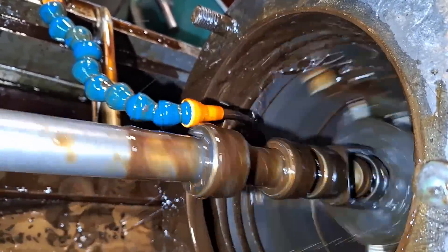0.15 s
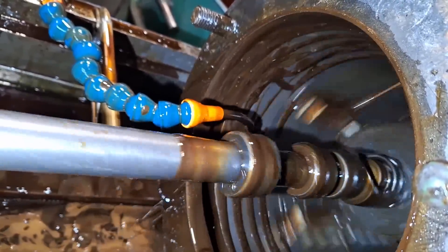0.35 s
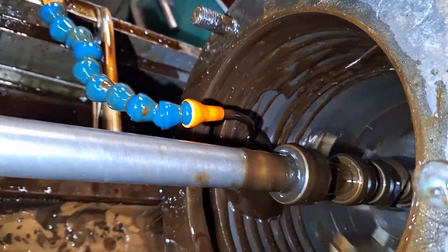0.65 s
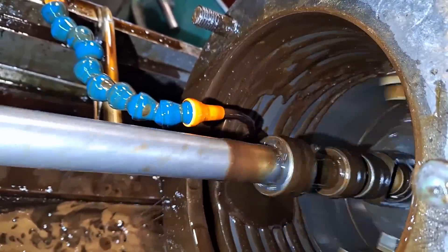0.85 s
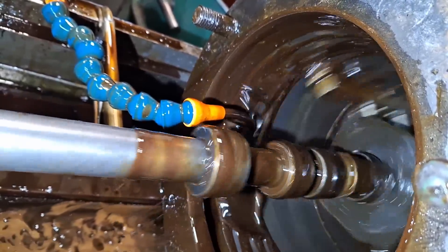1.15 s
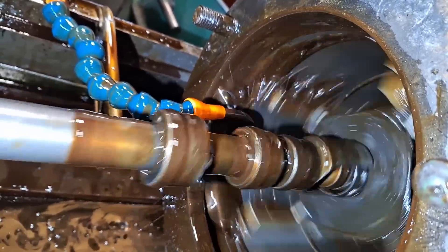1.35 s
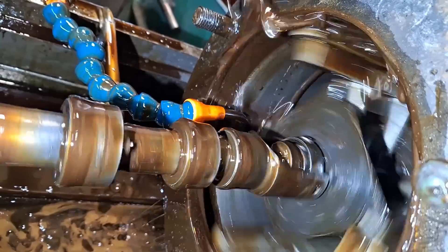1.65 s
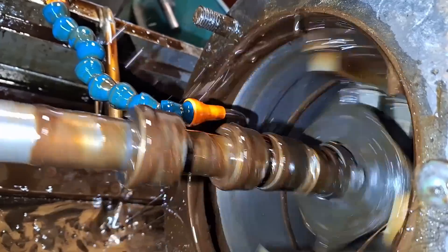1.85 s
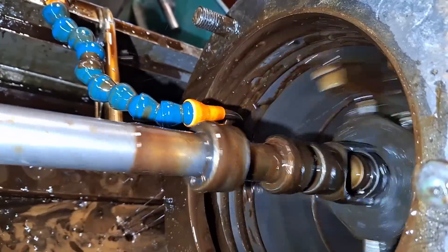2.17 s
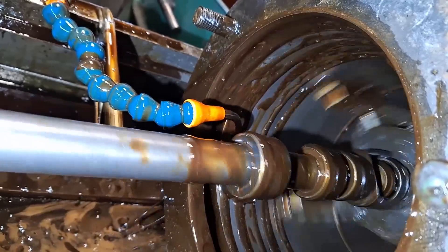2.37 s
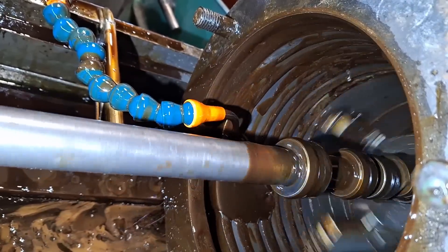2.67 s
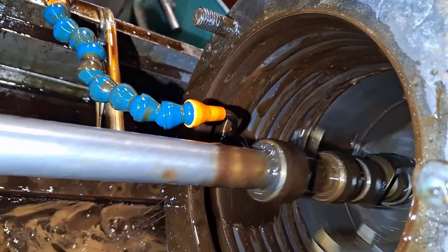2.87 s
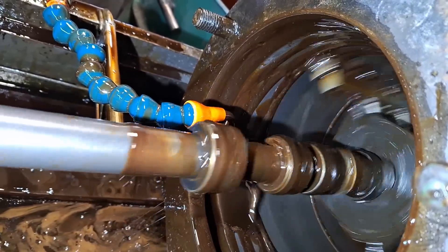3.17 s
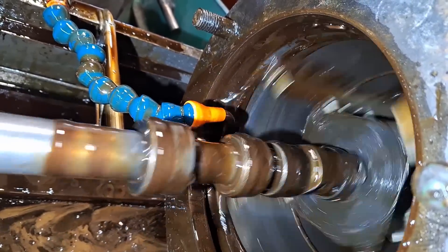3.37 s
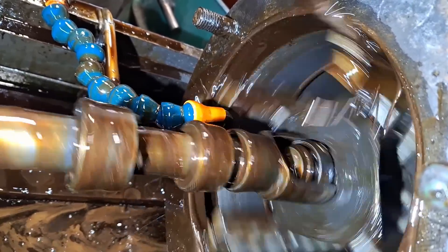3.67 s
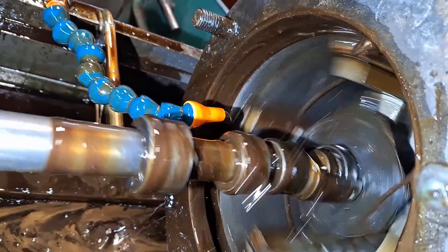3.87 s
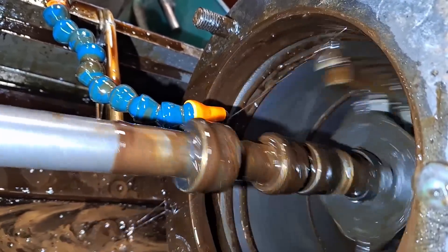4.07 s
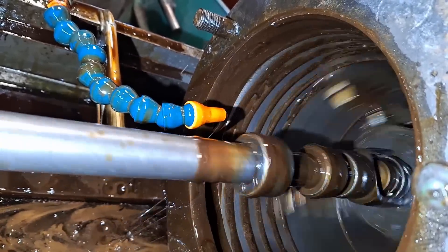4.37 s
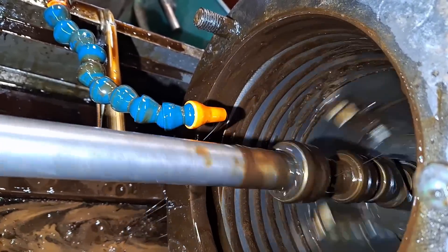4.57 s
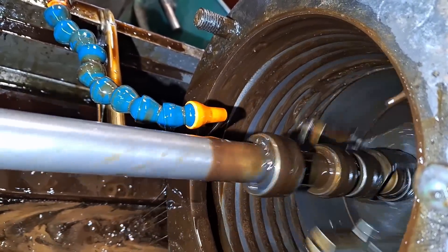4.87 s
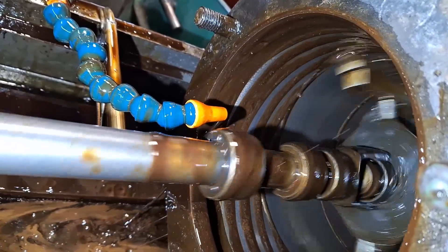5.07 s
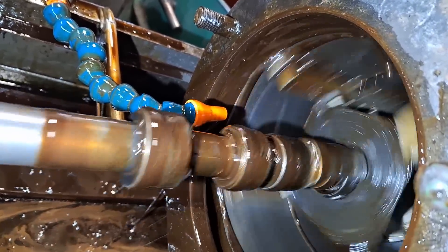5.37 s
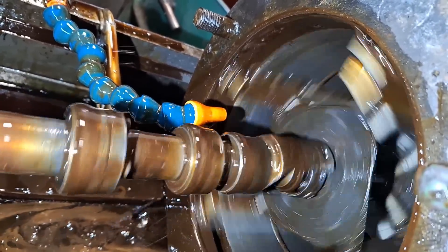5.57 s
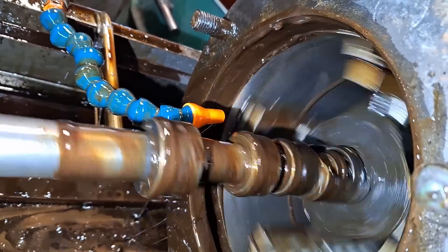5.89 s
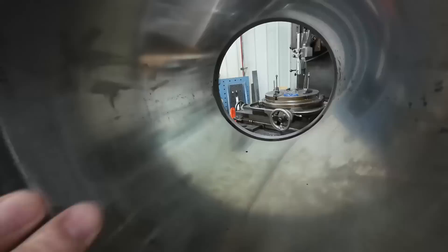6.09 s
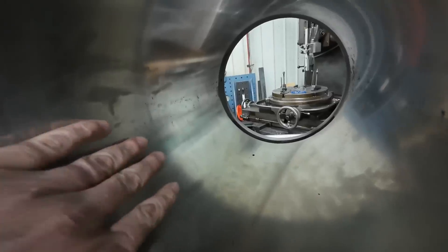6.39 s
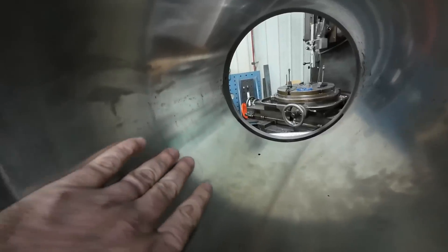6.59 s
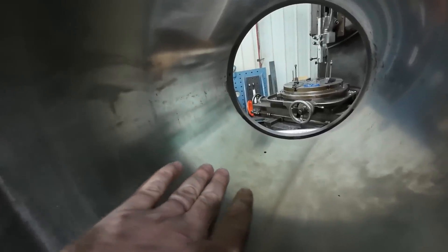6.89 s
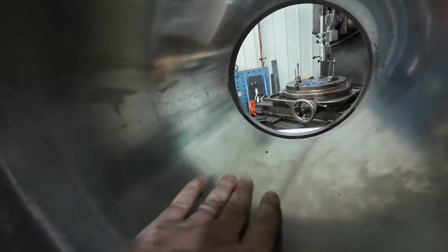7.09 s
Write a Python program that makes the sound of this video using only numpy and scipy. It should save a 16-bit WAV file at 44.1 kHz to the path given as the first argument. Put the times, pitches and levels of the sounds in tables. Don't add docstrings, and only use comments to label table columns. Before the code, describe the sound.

Close in a machine shop, a hone strokes through an oil-flooded iron cylinder: swelling mains hum, gritty scraping, ringing wall and bright oil hiss. A valve clanks with a small bounce at each reversal, about once a second, amid ticks and dull knocks. A distant compressor runs down early. Near the end it cuts to a far quieter hollow bore, with a faint finger brush and distant machines.

```python
import sys
import numpy as np
from scipy import signal
from scipy.fft import rfft, irfft, next_fast_len
from scipy.io import wavfile
from scipy.ndimage import uniform_filter1d

SR = 44100
rng = np.random.default_rng(int(sys.argv[2]) if len(sys.argv) > 2 else 0)


def volts_from_db(level):
    exponent = np.asarray(level, float) / 20
    return 10 ** exponent


def to_wav(sig):
    pcm = np.clip(np.atleast_2d(sig), -1, 1) * 32767
    pcm = np.round(pcm).astype(np.int16)
    wavfile.write(sys.argv[1], SR, pcm.T)


N = 319264
TIME = np.arange(N) / SR

# start in seconds, peak in dB, housing in dB re peak.
CLANKS = [
    (0.6728, -13, -6.5),
    (1.649, -13, -6.5),
    (2.657, -14, -5),
    (3.622, -13.5, -7.5),
    (4.6306, -13.5, -7),
    (5.597, -15, -4),
]


def curves(table):
    s, *columns = np.transpose(table)
    return [np.interp(TIME, s, c) for c in columns]


def along(table, hz):
    f, v = np.transpose(table)
    return np.interp(np.log(hz + 1), np.log(f), v)


def unit(x):
    return x / np.sqrt(np.mean(x ** 2))


def walk(rate_hz):
    k = int(SR / rate_hz)
    held = np.repeat(rng.standard_normal(N // k + 1), k)
    return 1.07 * uniform_filter1d(uniform_filter1d(held, k), k)[:N]


def bump(age_s, length_s):
    return np.exp(-(age_s / length_s) ** 2)


def ports(common, apart, hz):
    # frequency in Hz, likeness (clipped to 0-1).
    likeness = [(60, 2), (130, 0), (290, 2), (640, 0.24), (1410, 0.22), (3100, 0.22), (6820, 0.08),
                (15000, -0.2)]
    # frequency in Hz, left minus right in dB.
    balance = [(60, 2), (110, 2.5), (200, 1), (380, -1), (700, -2), (1290, -1.5), (2380, -7.5),
               (4400, -3.5), (8120, -2.0), (15000, -6.5)]
    lag_s = 24 / SR
    like = np.clip(along(likeness, hz), 0, 1)
    turns = hz * lag_s * np.clip(hz / 1500, 0, 1) * (hz < 4600)
    late = np.exp(-2j * np.pi * turns)
    tilt = volts_from_db(along(balance, hz) / 2)
    shared = np.sqrt(like) * common
    own = np.sqrt(1 - like)
    left = tilt * (shared * late + own * apart[0])
    right = (shared + own * apart[1]) / tilt
    return np.array([left, right])


def wash(colour, flicker_db, rate_hz, grit_db=0., wide=True):
    size = next_fast_len(N)
    hz = np.arange(size // 2 + 1) * SR / size
    low_hz, high_hz = colour[0][0], colour[-1][0]
    grains = rng.standard_normal((3, N)) * volts_from_db(grit_db * rng.exponential(size=(3, N)))
    common, *apart = rfft(grains, size)
    spectra = ports(common, apart, hz) if wide else np.array([common, common])
    spectra = spectra * volts_from_db(along(colour, hz)) * (hz > low_hz) * (hz < high_hz)
    out = 0
    for octave in np.arange(np.log2(low_hz), np.log2(high_hz) + .5, .5):
        share = np.clip(1 - 2 * abs(np.log2(hz + 1) - octave), 0, 1)
        out = out + volts_from_db(flicker_db * walk(rate_hz)) * irfft(spectra * share, size)[:, :N]
    return unit(out)


def ring(x, hz, width_hz):
    return signal.lfilter(*signal.iirpeak(hz, hz / width_hz, SR), x)


def place(x, pan_db, size=0):
    return np.array([np.roll(x, size) * volts_from_db(pan_db / 2), x * volts_from_db(-pan_db / 2)])


def tone(hz, wobble_rad):
    return np.sqrt(2) * np.sin(2 * np.pi * hz * TIME + wobble_rad * walk(7))


def burst(s, length_s, firm=0.):
    age_s = np.maximum(TIME - s, 0)
    contacts = rng.standard_normal(N)
    solid = firm * np.sqrt(length_s * SR) * (np.arange(N) == int(s * SR))
    fade = np.exp(-age_s / length_s) * (1 + 0.86 * np.exp(-age_s / 0.0015))
    return (TIME >= s) * fade * contacts + solid


def struck(drive, modes):
    y = 0
    for hz, db, t60_s in modes:
        y = y + volts_from_db(db) * np.sqrt(t60_s) * ring(ring(drive, hz, 2.0 / t60_s), hz, hz / 3)
    return y / abs(y).max()


def catches(events, sharpness, pan_db, size):
    rings = [volts_from_db(db) * struck(burst(s, length_s), [(hz, 0, sharpness / hz)]) for s, db, hz, length_s in events]
    return place(sum(rings), pan_db, size=size)


def stroke():
    # seconds from closing, hum in dB, second harmonic in dB,
    # extra stone pressure in dB.
    cycle = [(0, -28, -53, 1.5), (.15, -27, -45, 1), (.33, -24, -43.5, 1.5), (.43, -20.5, -47, 2.1),
             (.68, -20.5, -40.5, 4), (.86, -21, -42, 1.5), (.98, -23.5, -43, 0.6), (1.22, -23, -41.5, 0.7),
             (1.33, -27.5, -50.5, .5), (1.65, -25, -43.5, 2.6), (1.78, -27, -54, 2.1)]
    cycle_s, closes_s = 1.993, 1.036
    s, *columns = np.transpose(cycle)
    age_s = (TIME - closes_s + cycle_s / 2) % cycle_s - cycle_s / 2
    return age_s, *[np.interp(age_s, s, c, period=cycle_s) for c in columns]


def motors():
    # time in seconds, drone in dB, whine in dB.
    rundown = [
        (0, -36, -50),
        (.4, -32, -48),
        (.85, -33.5, -48),
        (.97, -36, -39),
        (1.2, -37, -37),
        (1.42, -41, -35),
        (1.52, -48, -54),
        (1.7, -54, -57),
    ]
    # frequency in Hz, level in dB re drone.
    casing = [(145, -12.5), (281, -12.5), (368, -16.5), (432, -17), (510, -13.5)]
    # frequency in Hz, level in dB per Hz.
    rumble = [(45, -18), (65, -4.5), (95, 2.5), (145, 7), (185, -3.5), (260, -3), (330, -9.5), (420, -34)]
    # frequency in Hz, level in dB per Hz.
    thud = [(18, -40), (30, -17), (40, -5), (50, 0), (60, -4), (70, -20)]
    hum_hz, drone_hz, whine_hz, pump_hz = 120.03, 73.2, 213, 1515
    age_s, hum_db, second_db, _ = stroke()
    drone_db, whine_db = curves(rundown) - 40 * np.clip(TIME - 1.7, 0, 2)

    running = np.clip((drone_db + 50) / 12, 0, 1)
    null_db = -11 * bump(age_s, .026)
    jolt_db = -3.5 * sum(bump(TIME - row[0], .03) for row in CLANKS[::2])
    sag_db = -2 * running
    hum_db = hum_db + null_db + jolt_db + sag_db + .6 * walk(12)
    hum = volts_from_db(hum_db) * tone(hum_hz, wobble_rad=0.27)
    hum = hum + volts_from_db(second_db) * tone(2 * hum_hz, wobble_rad=0.45)

    drone = volts_from_db(drone_db - 0.7) * tone(drone_hz, wobble_rad=0.26)
    for hz, db in casing:
        drone = drone + volts_from_db(0.58 * drone_db - 15 + db) * tone(hz, wobble_rad=1.0)
    whine = volts_from_db(whine_db) * tone(whine_hz, wobble_rad=.3)

    pump_db = -52.5 + 7 * bump(age_s, 0.53) + 1.4 * walk(2.8)
    pump = volts_from_db(pump_db) * unit(ring(rng.standard_normal(N), pump_hz, 22))

    shake_db = -48 + 4.5 - 1.34 * TIME
    frame = volts_from_db(-35) * wash(rumble, 1.15, 5.5) + volts_from_db(shake_db) * wash(thud, 3.1, 2.8)
    return place(hum + drone, 4.5) + place(whine, 2.5) + place(pump, -1.5) + frame


def hone():
    # frequency in Hz, width in Hz, level in dB.
    wall_modes = [(283.5, 49, -50.5), (355.7, 15, -50.5), (446, 19, -54.5), (505.5, 4.8, -57.5),
                  (566, 16, -57), (843, 45, -45.5), (1193, 30, -50.5), (1752, 44, -47.5), (1960, 120, -48),
                  (3050, 34, -47.5), (3244, 210, -47), (3470, 17, -43), (3623, 53, -52.5), (5540, 250, -53)]
    # frequency in Hz, level in dB per Hz.
    ring_colour = [(160, -16), (280, -6.5), (308, -1.5), (467, -1), (632, -3.5), (851, -8), (935, -8),
                   (1160, -4.5), (1260, -15), (1400, -8.5), (1820, -41), (3080, -120)]
    # frequency in Hz, level in dB per Hz.
    scrape_colour = [(760, -45.5), (1300, -7.5), (1530, 0), (1640, -4), (1760, -1), (2450, -3.5), (3030, 0),
                     (3260, -3), (3550, 0.5), (4520, -6.5), (4800, -9.5), (6240, -14), (10600, -120)]
    # frequency in Hz, level in dB per Hz.
    hiss_colour = [(2590, -33), (4400, -2), (4700, -5.5), (5130, 1), (5730, 1.5), (6300, -0.5), (7430, -1),
                   (10400, -8.5), (11800, -8.5), (15300, -41), (22000, -120)]
    # frequency in Hz, level in dB per Hz.
    spray_colour = [(10500, -18), (11500, -3.5), (12500, -1), (13200, 0.5), (14200, -0.5), (15000, 1.5),
                    (15700, 0.5), (16000, -6)]
    # frequency in Hz, level in dB per Hz.
    throttle_colour = [(11300, -22), (11900, 0), (12700, 1), (13300, 3), (13900, -20)]
    # time in seconds, gain in dB, length in seconds.
    spurts = [
        (1.73, 0.5, 0.018),
        (1.857, 1, 0.012),
        (2.818, 0.5, 0.018),
        (3.683, -0.5, 0.015),
        (3.835, 2.5, 0.016),
        (4.925, 1.5, 0.012),
        (5.424, 1, .02),
        (5.807, 3.5, 0.02),
    ]
    press_db = stroke()[-1]
    swing_db = press_db - np.mean(press_db)

    wall = 0
    for hz, width_hz, db in wall_modes:
        grit = rng.standard_normal((2, N)) + 400 / hz * rng.standard_normal(N)
        wall = wall + volts_from_db(db + 3.4 * walk(8.1)) * unit(ring(grit, hz, width_hz))
    wall = volts_from_db(swing_db) * wall
    ring_db = -36.5 - 0.63 * TIME + .7 * swing_db
    bore = volts_from_db(ring_db) * wash(ring_colour, 2.0, 11, grit_db=2.5)

    scrape = volts_from_db(-33.5 + press_db + 2.4) * wash(scrape_colour, 1.4, 22, grit_db=1.5)
    hiss = volts_from_db(-32 + 0.41 * press_db + 1.46) * wash(hiss_colour, 0.6, 18, grit_db=2.35)
    spray = volts_from_db(-38.5 + 0.55 * press_db + 4.5) * wash(spray_colour, .8, 20, grit_db=2.2)
    spurt_db = sum(db * bump(TIME - s, length_s) for s, db, length_s in spurts)
    reversals = np.searchsorted(np.array(CLANKS)[:, 0], TIME)
    inward = uniform_filter1d(1. - reversals % 2, size=1500)
    throttle = volts_from_db(-38) * inward * wash(throttle_colour, .8, 16)

    sway = place(np.ones(N), -0.11 * swing_db)
    slosh = volts_from_db(.85 * walk(24))
    return slosh * sway * (scrape + volts_from_db(spurt_db) * (hiss + spray) + throttle) + bore + wall


def stones():
    # start in seconds, peak in dB, ring in Hz, length in seconds.
    ticks = [(1.782, -15, 3000, .007), (1.79, -15, 3620, .011), (1.825, -32, 5600, .006),
             (3.56, -21, 5270, .004), (3.565, -8.5, 3360, 0.0053), (1.27, -21, 3460, 0.0055),
             (5.782, -18.5, 3450, 0.028), (5.797, -21, 4050, .01), (3.69, -28, 3200, .004),
             (4.69, -31, 3400, .006), (4.812, -22.5, 3480, 0.01), (5.338, -20, 3770, 0.0044),
             (5.657, -25, 3050, .004)]
    # start in seconds, peak in dB, ring in Hz.
    further = [(0.3551, -17, 3060), (0.7711, -23, 3690), (1.6626, -22, 3540), (2.141, -26, 3460),
               (2.7422, -23, 2910), (3.7693, -23, 3430), (4.0594, -27, 3420), (4.1094, -23, 2990),
               (4.2278, -26, 2980), (4.3715, -20, 3450), (5.1213, -25, 3400), (5.5692, -22, 3510),
               (5.7009, -23, 2930), (5.7877, -20, 3470)]
    light = [(s, db - 2, hz, .006) for s, db, hz in further]
    return catches(list(ticks) + light, 18, -4.5, size=24)


def shaft_joint():
    # start in seconds, peak in dB, ring in Hz, length in seconds.
    knocks = [
        (.79, -22, 800, 0.0087),
        (1.848, -20.5, 300, 0.0037),
        (4.91, -25, 350, 0.006),
        (5.44, -22, 600, .006),
        (5.655, -19, 800, 0.0046),
        (.575, -24, 900, 0.0041),
        (2.58, -26, 800, 0.0043),
        (3.84, -30, 500, .006),
    ]
    return catches(knocks, 1.9, .3, size=4)


def valve():
    # frequency in Hz, level in dB, t60 in seconds.
    spool_modes = [
        [(1684, 3, 0.034), (1797, 0, 0.069), (1977, -1, 0.062), (2290, -10, 0.051), (1448, -6, .06)],
        [(1555, -0.5, 0.044), (1785, 0.5, 0.049), (2133, -6, 0.04), (1953, -6.5, .06), (2264, -6.5, 0.076)],
    ]
    # frequency in Hz, level in dB, t60 in seconds.
    housing_modes = [
        [(563, -0.5, 0.12), (900, -4, 0.077), (1115, -9.5, 0.085), (246, -4, 0.048)],
        [(628, -4.5, 0.13), (936, -4, 0.054), (1194, -5, 0.082), (560, -9.5, 0.12)],
    ]
    # delay in seconds, level in dB.
    bounces = [
        (0, 0),
        (.018, -7.5),
        (.042, -12),
        (.062, -17),
    ]
    # frequency in Hz, level in dB, t60 in
    # seconds.
    tail_modes = [(700, -20, .004), (1050, -22, 0.0033), (1800, -21, .002)]
    rattle_s, housing_late_s, tail_late_s = 0.0041, 0.001975, 0.0068
    firm = volts_from_db(7.5)
    out = 0
    for k, (s, db, housing_db) in enumerate(CLANKS):
        blows, late = 0, 0
        for delay_s, fall_db in bounces:
            blows = blows + volts_from_db(fall_db) * burst(s + delay_s, rattle_s, firm)
            late = late + volts_from_db(0.45 * fall_db) * burst(s + delay_s + housing_late_s, 1.2 * rattle_s, firm)
        spool = place(struck(blows, spool_modes[k % 2]), -5.5, size=24)
        housing = place(struck(late, housing_modes[k % 2]), -.3, size=10)
        tail = np.array([struck(burst(s + tail_late_s, .04), tail_modes) for _ in range(2)])
        out = out + volts_from_db(db) * (spool + volts_from_db(housing_db) * housing) + volts_from_db(db - 9.5) * tail
    return out


def quiet_shop():
    # frequency in Hz, level in dB per Hz.
    shop_colour = [(30, -44), (60, -19), (85, -20), (125, -25), (160, -14), (205, -21), (250, -9),
                   (340, -13), (440, -10), (630, -15.5), (1150, -17.5), (2600, -25.5), (4000, -36),
                   (8000, -43.5), (16000, -55)]
    # frequency in Hz, level in dB per Hz.
    brush_colour = [(2500, -20), (4000, 0), (5500, -1), (7000, -6), (8300, -1), (10000, -9), (13000, -11),
                    (16000, -18)]
    # frequency in Hz, level in dB per Hz.
    air_colour = [(4000, -11), (6000, -5), (10000, -6), (12500, -1), (13900, 2), (15000, -5), (16000, -9)]
    # time in seconds, brush in dB, squeak in Hz, squeak in dB.
    fingers_path = [
        (6.11, -57, 14400, -74),
        (6.14, -56, 14000, -69),
        (6.19, -57, 13400, -69),
        (6.22, -59, 12800, -71),
        (6.24, -62, 11800, -84),
        (6.27, -65, 10500, -76),
        (6.31, -76, 9800, -95),
        (6.38, -92, 9500, -110),
    ]
    # time in seconds, level in dB.
    leak_path = [
        (6.3, -92),
        (6.41, -88),
        (6.46, -72),
        (6.6, -73),
        (6.9, -73),
        (7.12, -74),
        (7.24, -79),
    ]
    brush_db, squeak_hz, squeak_db = curves(fingers_path)
    pitch_hz = squeak_hz * (1 + .006 * walk(400))
    squeak = volts_from_db(squeak_db + 3.5 * walk(90)) * np.sin(2 * np.pi * np.cumsum(pitch_hz) / SR)
    fingers = volts_from_db(brush_db) * wash(brush_colour, 2.2, 10, wide=False) + squeak
    leak = volts_from_db(curves(leak_path)[0]) * wash(air_colour, .8, 12, wide=False)
    boom = volts_from_db(-62.5 + 1.4 * walk(11)) * tone(172, wobble_rad=.7)
    return volts_from_db(-52) * wash(shop_colour, 1.8, 5.5, wide=False) + fingers + leak + boom


def scene():
    change_s = 6.1095
    before = np.clip((change_s - TIME) * SR / 20, 0, 1)
    honing = motors() + hone() + stones() + shaft_joint() + valve()
    return before * honing + (1 - before) * quiet_shop()


def roll_off(x):
    return signal.sosfilt(signal.butter(12, 17080, fs=SR, output="sos"), x)


def record(dry):
    peak_limit, top_hz = .75, 15800
    rounded = peak_limit * np.tanh(dry / peak_limit)
    low_pass = signal.ellip(12, .2, 80, top_hz, fs=SR, output="sos")
    return roll_off(signal.sosfilt(low_pass, rounded))


dry = scene()
out = record(dry)
to_wav(out)
```